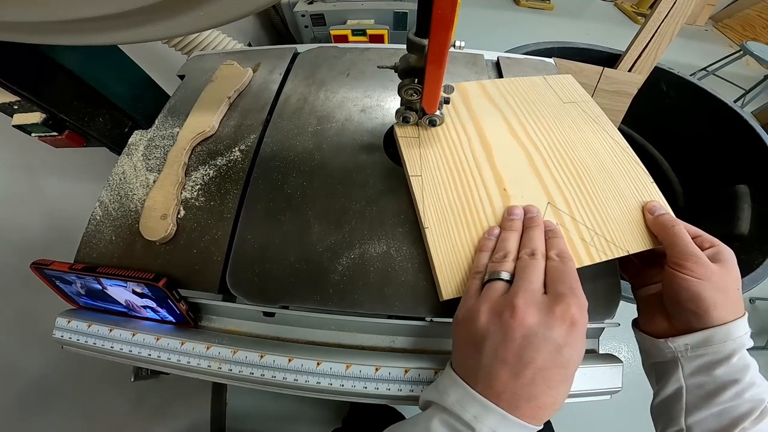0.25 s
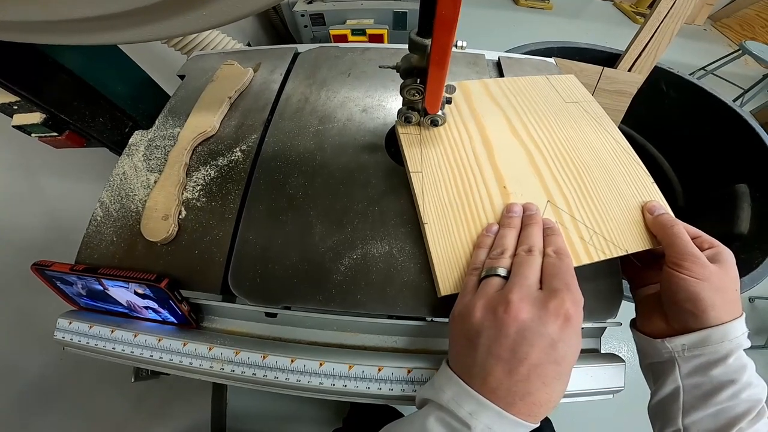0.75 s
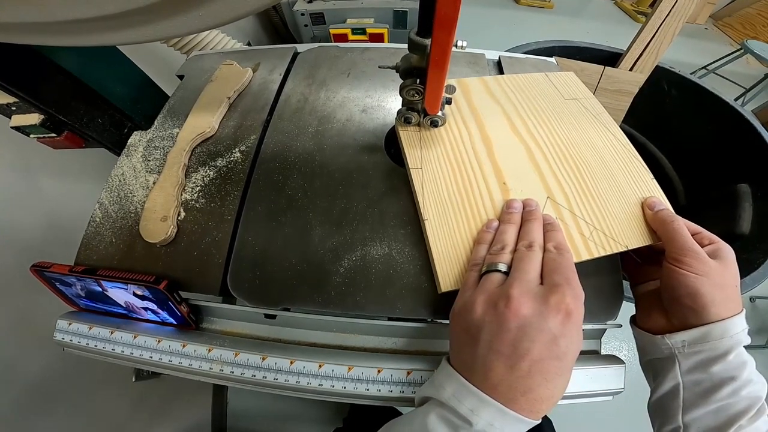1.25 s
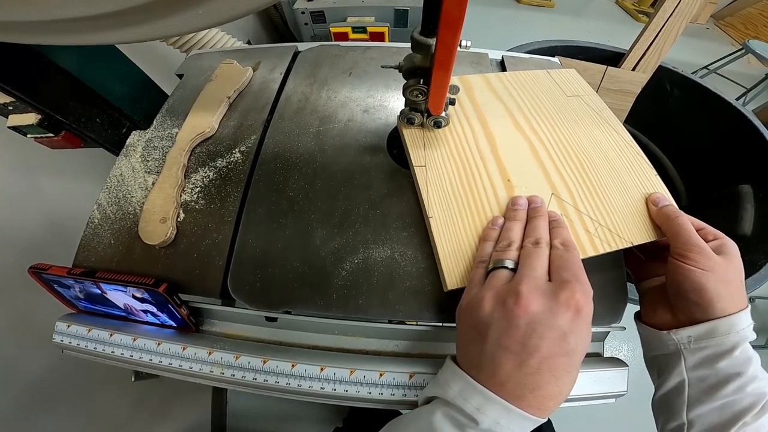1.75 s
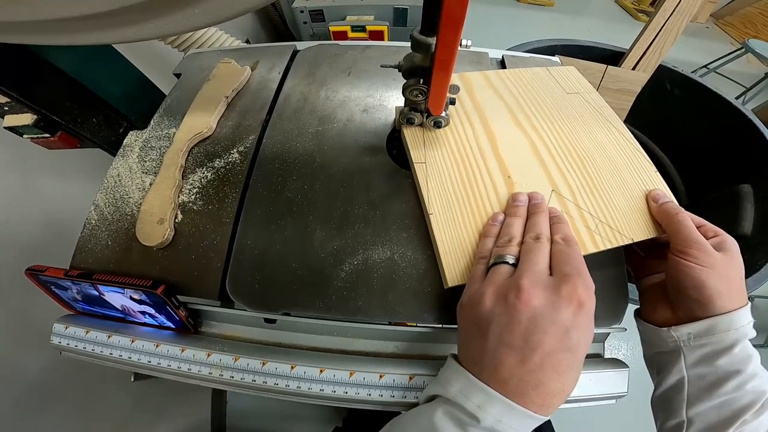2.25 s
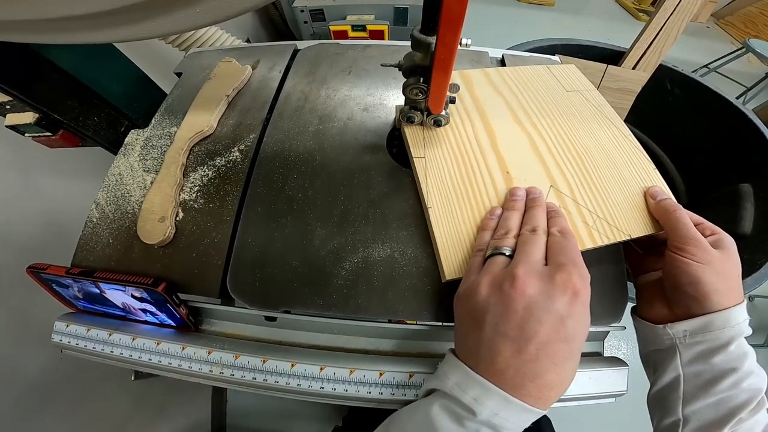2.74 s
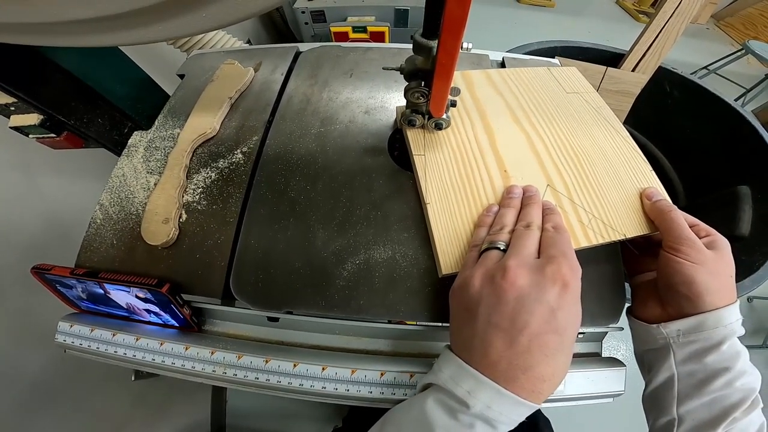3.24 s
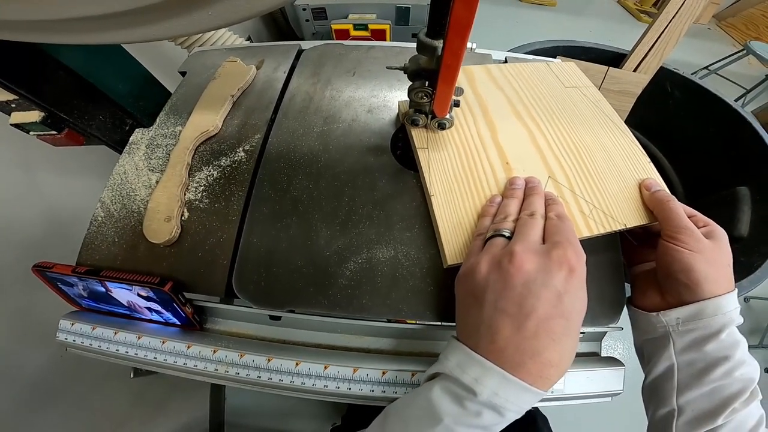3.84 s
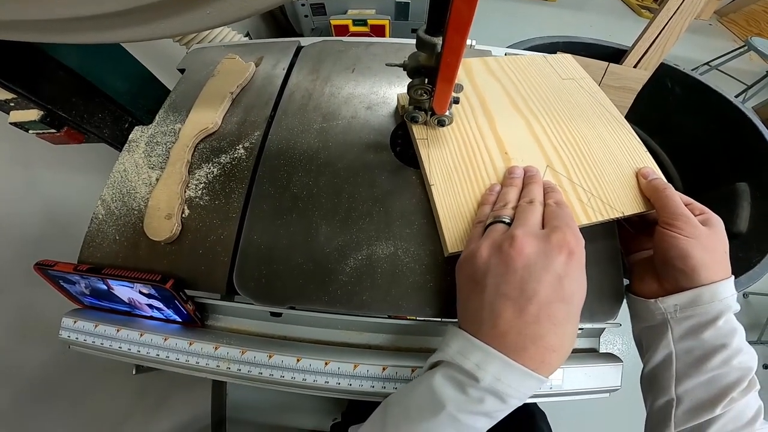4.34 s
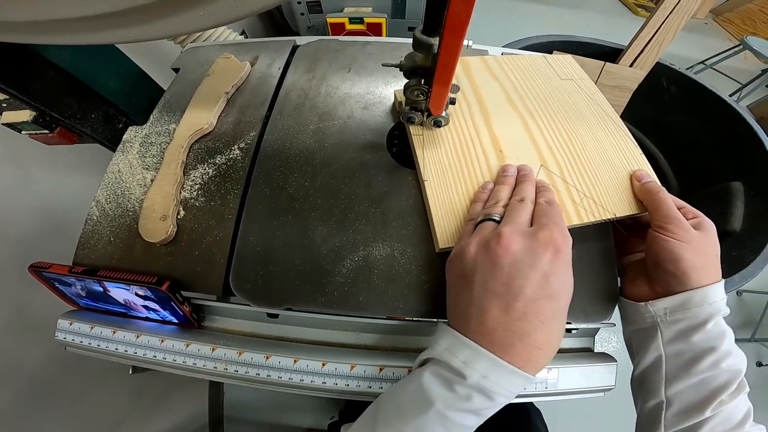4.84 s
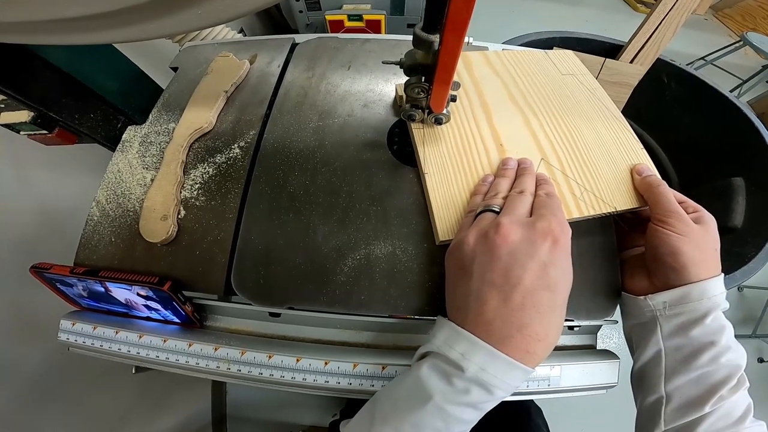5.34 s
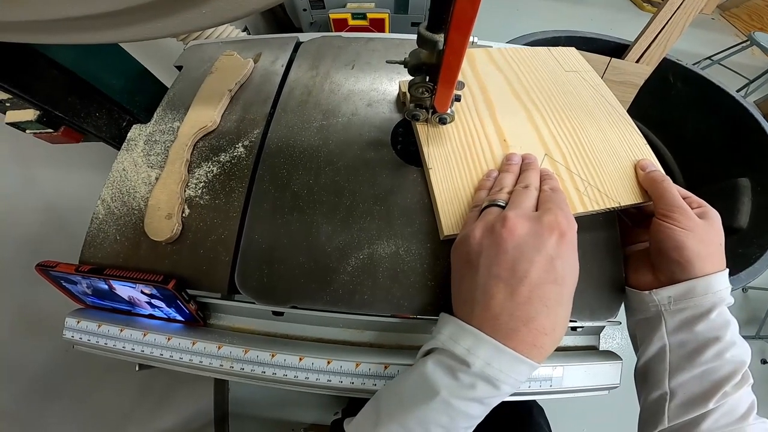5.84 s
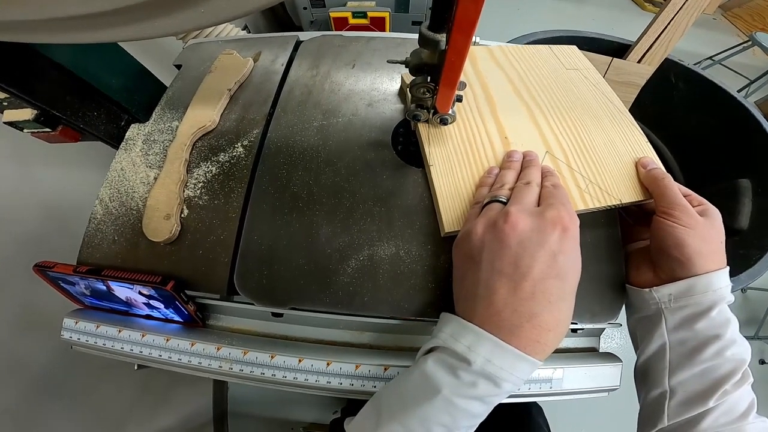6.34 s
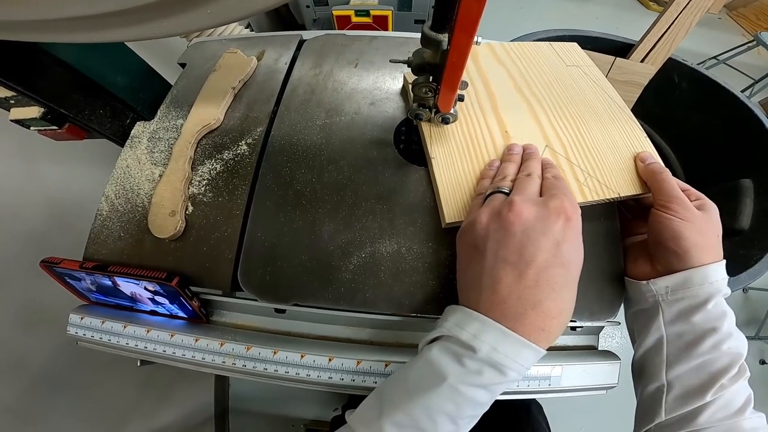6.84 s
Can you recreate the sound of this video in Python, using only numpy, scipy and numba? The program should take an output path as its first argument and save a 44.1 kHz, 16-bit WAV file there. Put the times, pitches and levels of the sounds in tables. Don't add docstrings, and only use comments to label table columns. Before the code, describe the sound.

A band saw is already at full speed and cutting pine from 0 s, heard close above the table in a workshop with short, bright reflections. A steady low hum near 120 Hz and soft frame rumble lie beneath constant raspy fibre hiss and a shrill whine around 3.7 kHz, layered with tooth overtones and throbbing about six times a second. Small high rings flicker during the first second; pressure eases slightly near 1.2 s. At 1.7 s the feed hardens and the blade rings sharply. Around 2.3 s a thin, nearly pure whistle starts and fades by 2.8 s. From 3 to 4.4 s the ringing bends up and down as the blade twists. At 5.2 s table panels give a brief low buzz. From 5.6 to 6.2 s high rings slide downward; then the hiss brightens near 6.7 s, and cutting continues to about 7 s without stopping.

```python
import sys
import numpy as np
from scipy import signal
from scipy.fft import rfft, irfft, next_fast_len
from scipy.io import wavfile
from scipy.ndimage import uniform_filter1d
from numba import njit

SR = 44100
rng = np.random.default_rng(int(sys.argv[2]) if len(sys.argv) > 2 else 0)


def voltage_ratio(decibels):
    exponent = np.asarray(decibels, float) / 20
    return 10 ** exponent


def to_wav(sig):
    pcm = np.clip(np.atleast_2d(sig), -1, 1) * 32767
    pcm = np.round(pcm).astype(np.int16)
    wavfile.write(sys.argv[1], SR, pcm.T)


N = 312333
T = np.arange(N) / SR
SLOW = T[::32]
SIZE = next_fast_len(N + SR)
HZ = np.maximum(np.arange(SIZE // 2 + 1) * SR / SIZE, 1)
WHEEL_HZ = 6.35
STEADY_S = 0.043


def level(x, rms_db):
    return x * voltage_ratio(rms_db) / np.sqrt(np.mean(np.abs(x) ** 2))


def shape(table):
    hz, db = np.transpose(table)
    return voltage_ratio(np.interp(np.log(HZ), np.log(hz), db))


def filtered(x, gain):
    return irfft(rfft(x, SIZE) * gain, SIZE)[..., :N]


def fine(slow, t_s=T):
    return np.interp(t_s, SLOW, slow)


def walk(rate_hz):
    hold = int(SR / 32 / rate_hz)
    steps = np.repeat(rng.standard_normal(len(SLOW) // hold + 1), hold)
    slewed = uniform_filter1d(uniform_filter1d(steps, hold), hold)
    return 1.46 * slewed[:len(SLOW)]


def lasting(start_s, end_s):
    fade_s = 0.035 + 0.06 * (end_s - start_s)
    return np.clip(np.minimum(SLOW - start_s, end_s - SLOW) / fade_s / 2 + 0.5, 0, 1)


def wheel(turn=0.082, quarter=0.12, spokes=0.08):
    angle = 2 * np.pi * WHEEL_HZ * SLOW
    start = rng.uniform(0, 2 * np.pi, 2)
    return 1 + turn * np.cos(angle + start[0]) + quarter * np.cos(4 * angle + start[1]) + spokes * np.cos(16 * angle)


@njit
def ring(x, hz, width_hz):
    y, band, low = np.empty(len(x)), 0., 0.
    for i in range(len(x)):
        g, damping = np.tan(np.pi * hz[i] / SR), width_hz / hz[i]
        v = (band + g * (x[i] - low)) / (1 + g * (g + damping))
        band, low, y[i] = 2 * v - band, low + 2 * g * v, damping * v
    return y


def steadied(rung, floor, exponent):
    return rung / (uniform_filter1d(rung ** 2, int(STEADY_S * SR)) + floor) ** exponent


def port_flutter():
    # hz, level_db_per_hz
    flutter_colour = [(10, -6), (25, -8), (60, -10), (150, -15), (16000, -60)]
    return level(filtered(rng.standard_normal((2, N)), shape(flutter_colour)), -53.5)


def motor():
    # time_s, level_db
    hum_load = [(0, -22.5), (.6, -23.5), (.95, -24.5), (3.5, -25.5), (4.0, -26), (5.4, -22.5), (5.85, -23),
                (6.5, -21), (7.08, -23.5)]
    # hz, under_hum_db, wander_0_to_1
    hum_lines = [(92.5, -20, 0.18), (103, -43, .3), (81.4, -42, .3), (128.5, -41, .3), (175.3, -27, 0.64),
                 (267.7, -28, 0.3), (303, -34, 0.4), (481.6, -25.5, 0), (544.7, -28, 0.12), (600, -56, 0)]
    # hz, width_hz, level_db
    cabinet = [(245.8, 7.9, -43), (339.7, 14, -49.5), (381, 11.3, -45.5), (203, 11, -53)]
    # hz, level_db_per_hz
    rumble_colour = [(12, -50), (22, -13), (64, -1), (110, 7), (150, -8.5), (250, -10.5), (520, -7),
                     (640, -12.5), (900, -18), (1500, -60)]
    hum_hz, rumble_db, rumble_rise_db_per_s = 119.95, -41.5, 0.4
    lines = np.sin(2 * np.pi * hum_hz * T)
    for hz, db, wander in hum_lines:
        size = voltage_ratio(db) * fine(1 + wander * walk(8))
        lines = lines + size * np.cos(2 * np.pi * hz * T + fine(wander * walk(8)))
    hum = np.sqrt(2) * voltage_ratio(np.interp(T, *np.transpose(hum_load))) * lines
    panels = 0
    for hz, width_hz, db in cabinet:
        panels = panels + level(ring(rng.standard_normal(N), np.full(N, 1. * hz), 1. * width_hz), db)
    rumble = level(filtered(rng.standard_normal(N), shape(rumble_colour)), rumble_db)
    return hum + panels + rumble * voltage_ratio(rumble_rise_db_per_s * (T - T.mean()))


def workshop(saw, ports, t60_s=0.26, places=3):
    # hz, echo_re_direct_db
    echo_colour = [(60, -40), (150, -37), (300, -16), (1000, -5), (2500, -9), (4200, -6.5), (6500, -4),
                   (9000, 2.5), (14000, 4)]
    out, spectrum = 0, rfft(saw, SIZE) * shape(echo_colour) * ports
    sway = np.array([walk(1.52) for _ in range(places)])
    for share in sway / np.sqrt(np.sum(sway ** 2, axis=0)):
        tail = rng.standard_normal((2, SR // 2)) * voltage_ratio(-60 * T[:SR // 2] / t60_s)
        tail = tail / np.sqrt(np.sum(tail[0] ** 2))
        out = out + fine(share) * irfft(spectrum * rfft(tail, SIZE), SIZE)[:, :N]
    return out


def whistle():
    # start_s, hz, level_db, fall_db_per_s, end_s
    whistles = [
        (2.27, 2347, -33, 6, 2.78),
        (2.9, 2347, -42, 10, 3.0),
        (2.29, 3227, -33, 12, 2.62),
        (5.235, 390, -37, 20, 5.31),
        (5.325, 387, -30.5, 10, 5.395),
        (5.27, 462, -39, 10, 5.315),
    ]
    out = 0
    for start_s, hz, db, fall_db_per_s, end_s in whistles:
        on = np.clip(np.minimum(SLOW - start_s, end_s - SLOW) / 0.014, 0, 1)
        fading = voltage_ratio(db - fall_db_per_s * (SLOW - start_s) * (on > 0))
        size = on * fading * wheel(0.16, 0.15, 0.05) * (1 + 0.2 * walk(25))
        out = out + np.sqrt(2) * fine(size) * np.cos(2 * np.pi * hz * T + fine(0.4 * walk(25)))
    return out


def fibres(phase, gate=0.49):
    return rng.standard_normal(N) * fine(wheel()) * (1 + gate * np.cos(phase))


def span(phase):
    # time_s, level_db, hz
    span_path = [(0.0, -25, 3784), (0.99, -26.5, 3790), (1.54, -23, 3730), (1.73, -33, 3780),
                 (2.68, -31, 3716), (3.05, -24, 3730), (3.18, -25, 3800), (3.7, -25, 3745),
                 (3.86, -24, 3880), (4.08, -25.5, 3770), (4.24, -32, 3840), (4.28, -26.5, 3700),
                 (4.4, -33, 3820), (4.61, -29, 3820), (5.88, -26.5, 3770), (6.09, -29, 3833),
                 (6.62, -24.5, 3773), (7.08, -25.5, 3740)]
    width_hz = 116
    s, db, hz = np.transpose(span_path)
    hz = fine(np.interp(SLOW, s, hz) + 0.16 * width_hz * walk(18))
    rung = level(ring(ring(fibres(phase), hz, 1.3 * width_hz), hz, 1.3 * width_hz), 0)
    rung = steadied(rung, 0.05, 0.18)
    return level(rung * fine(voltage_ratio(1.3 * np.interp(SLOW, s, db))), -25)


def waking():
    # start_s, end_s, hz, level_db
    board = [(-0.38, 0.98, 1095, -40.5), (0.09, 0.57, 1095, -42.5), (3.4, 4.4, 2700, -42.5),
             (1.33, 1.97, 2750, -46), (0.92, 2.7, 1095, -40), (2, 4.7, 1105, -48), (1.5, 1.98, 1000, -39),
             (2, 2.7, 1300, -43.5), (4.6, 5.7, 1335, -44.5), (0, 2, 1410, -47.5), (2.5, 5, 1425, -39.5),
             (4.5, 5.6, 1610, -38.5), (6.0, 7.3, 1600, -44), (3.6, 4.77, 1890, -38.5),
             (6.5, 7.4, 1880, -37.5), (4.6, 6.0, 2070, -40), (-0.25, 1.84, 2750, -39.5),
             (5, 7.3, 2800, -45)]
    # start_s, end_s, hz, level_db
    kerf = [(-0.5, 1.43, 3450, -34), (1.41, 1.72, 3450, -30), (1.9, 3.2, 3500, -33), (2, 2.88, 3570, -28),
            (4.5, 5.7, 3690, -36), (0.5, 1.8, 6170, -46), (1.9, 2.75, 6650, -39),
                    (4.14, 4.5, 4850, -28.5), (2.75, 3.3, 7530, -40), (3.45, 3.82, 7500, -39),
            (6.5, 7.2, 3500, -36), (6, 6.7, 5250, -33), (2.5, 2.9, 5740, -35), (2, 3.05, 5700, -33),
            (3.85, 5.2, 8675, -39.5), (0.5, 1.9, 8920, -47), (3.8, 4.97, 11820, -49),
            (0.5, 1.85, 12100, -52), (2.5, 3.65, 14800, -60), (.9, 1.95, 14900, -62),
            (-0.9, .15, 14900, -66), (5.8, 7.3, 14850, -64), (2.3, 3.4, 15500, -61), (3.6, 5.2, 10800, -56),
            (1.5, 2.7, 10900, -54), (4, 5.9, 13800, -58)]
    # start_s, end_s, hz, level_db
    blade = [(1.54, 1.68, 2985, -28), (1.72, 1.86, 2990, -31), (1.74, 1.95, 3785, -23.5),
             (2, 2.08, 3850, -25), (6.5, 6.86, 6600, -33), (6.5, 7.1, 5560, -36), (6.55, 6.95, 4300, -34),
             (2, 2.35, 2980, -36), (1.8546, 1.97, 2985, -24.5), (2.5, 3.08, 4325, -34.5),
             (4.6, 5.6, 4315, -31.5), (0.2, 0.58, 5570, -31), (0.61, .63, 5550, -23),
             (0.74, 0.76, 5545, -24), (0.92, 0.95, 5000, -29), (1.02, 1.12, 5530, -27),
             (1.24, 1.46, 5520, -32), (1.05, 1.43, 5440, -31), (1.58, 1.8, 5100, -35),
             (1.67, 1.9, 5380, -32), (2.5, 3.1, 6200, -38), (6, 6.09, 6915, -29), (3.95, 4.8, 11780, -55),
             (5, 5.5, 9700, -46), (0.5, 3.6, 14130, -66), (6.5, 6.6, 5535, -41), (2.75, 3.7, 7540, -44),
             (5.5, 5.6, 7540, -36), (5.72, 5.98, 8890, -37), (5.5, 5.5, 7500, -36), (6.12, 8.2, 9875, -42),
             (6.1, 7.3, 14130, -58)]
    # start_s, end_s, hz, level_db
    squeal = [
        (0.5, 1.5, 6030, -37),
        (3, 3.1, 6030, -40),
        (3, 6.5, 2079, -45.5),
        (-2, 2.7, 3318, -43),
    ]
    # start_s, end_s, hz, level_db
    table_panels = [
        (4.4, 5.1, 250, -44.5),
        (6.0, 6.6, 249, -41.5),
        (0.72, 3.1, 340, -48.5),
        (5.235, 5.4, 400, -38),
        (5.42, 5.5, 370, -38),
        (5.25, 5.33, 450, -41),
    ]
    # start_s, end_s, first_hz, last_hz, level_db
    twists = [(3.917, 3.997, 3670, 3500, -29), (4.25, 4.358, 3790, 3730, -26), (5.6, 5.9, 7500, 6800, -30),
              (5.896, 6.0, 5760, 5230, -25.5), (5.964, 6.058, 4970, 4700, -30),
              (6.043, 6.1, 5550, 5350, -27), (6.1, 6.13, 4980, 4930, -29), (6.15, 6.19, 5350, 5100, -26),
              (3.06, 3.18, 3660, 3830, -30), (3.27, 3.47, 3815, 3750, -28), (3.48, 3.556, 3850, 3680, -26),
              (3.696, 3.837, 3770, 3860, -25), (4.038, 4.14, 3870, 3710, -26),
              (5.93, 6.14, 5700, 4900, -29)]
    blade_width_hz, twist_blur = 68, 0.81
    rows = []
    for spells, q in [(board, 25.7), (kerf, 26.5), (squeal, 260), (table_panels, 19.5)]:
        rows += [(t0, t1, hz, hz, hz / q, db) for t0, t1, hz, db in spells]
    rows += [(t0, t1, hz, hz, blade_width_hz, db) for t0, t1, hz, db in blade]
    return rows + [(t0, t1, hz0, hz1, twist_blur * abs(hz0 - hz1), db) for t0, t1, hz0, hz1, db in twists]


def resonances(phase, teeth):
    drive, out = fibres(phase) + voltage_ratio(-40) * teeth, np.zeros(N)
    for start_s, end_s, first_hz, last_hz, width_hz, db in waking():
        fade = lasting(start_s, end_s)
        awake_s = SLOW[fade > 0]
        on = slice(int(awake_s[0] * SR), int(awake_s[-1] * SR))
        glide_hz = np.interp(SLOW, [start_s, end_s], [first_hz, last_hz])
        hz = fine(glide_hz + 0.13 * width_hz * walk(9), T[on])
        rung = level(ring(ring(drive[on], hz, 1.36 * width_hz), hz, 1.36 * width_hz), 0)
        rung = steadied(rung, 0.06, 0.125)
        out[on] += level(rung, db) * fine(fade, T[on])
    return out


def hollows():
    # hz, width_hz, gain_db
    dips = [(673, 140, -4.5), (1650, 150, -2.5), (2235, 80, -6.5), (2475, 73, -5.5), (3310, 170, -2.5),
            (4740, 170, -4), (6330, 220, -6), (8230, 160, -9), (10800, 560, -6.5), (3160, 70, -2.5),
            (7130, 80, -2.5), (9100, 130, -5.5), (3610, 50, -2.5), (13350, 250, -3), (2600, 62, -2)]
    return voltage_ratio(sum(db * np.exp(-((HZ - hz) / width_hz) ** 2) for hz, width_hz, db in dips))


def tearing(phase):
    # hz, level_db_per_hz
    tear_colour = [(400, -40), (750, -24.5), (1100, -21), (2000, -16.5), (2350, -17), (3200, -15),
                   (3750, -4), (4200, -10), (5800, -10.5), (6400, -15.5), (8000, -18), (11000, -32.5),
                   (12200, -33.5), (14200, -45.5), (15800, -53)]
    # time_s, pressure_db, grain_dryness_db
    feed_path = [(0, 0.5, 1), (.6, -1.5, 1.5), (1.2, -3, -0.5), (1.7, 1.5, 0), (2.0, -1.5, -2.5),
                 (2.3, 3.5, -4), (2.8, 1, -3.5), (3.2, -1, -4.5), (4.0, -0.5, -2), (4.3, 0, 2),
                 (4.9, 1, 2.5), (5.6, 0.5, 3.5), (5.9, -2, -1), (6.198, 0, 0), (6.45, -1, 1),
                 (6.7, -1.5, 5), (7.08, 0, 0.5)]
    # hz, db_per_db_of_dryness
    dry_share = [(900, 0), (1400, -0.05), (3600, -0.07), (5000, 0.16), (8000, 1.24), (13000, 0.2)]
    s, feed, dryness = np.transpose(feed_path)
    feed_db, dry_db = np.interp(SLOW, s, feed), np.interp(SLOW, s, dryness)
    hz, share = np.transpose(dry_share)
    source = rfft(fibres(phase), SIZE) * shape(tear_colour) * hollows() * (HZ > 500)
    out = 0
    for octave in np.arange(9, 14.1, 0.25):
        slice_gain = np.clip(1 - 4 * np.abs(np.log2(HZ) - octave), 0, 1)
        flicker_db = 0.82 * walk(2.59) + 1.23 * walk(14)
        db = feed_db + np.interp(octave, np.log2(hz), share) * dry_db + flicker_db
        out = out + fine(voltage_ratio(db)) * irfft(source * slice_gain, SIZE)[:N]
    return level(out, -24)


def overtone(phase, order, loops=0):
    loop_hz = 2.7
    shake = 1 + (0.24 + 0.017 * order) * (walk(40) + 1j * walk(40))
    wobble = order * 0.08 * np.sin(2 * np.pi * WHEEL_HZ * SLOW) + 2 * np.pi * loops * loop_hz * SLOW
    throb = wheel(0.11, 0.26 + 0.091 * (order == 2), 0.18)
    swing = shake * throb * np.exp(1j * (wobble + rng.uniform(0, 2 * np.pi)))
    return level(fine(swing.real) * np.cos(order * phase) - fine(swing.imag) * np.sin(order * phase), 0)


def swell(spells, order):
    gains = [db * lasting(t0, t1) for t0, t1, at, db in spells if round(at) == round(order)]
    return sum(gains, np.zeros(len(SLOW)))


def song(phase):
    # multiple, level_db
    strong_orders = [(2, -41.5), (3, -51), (4, -30), (6, -29.5)]
    # start_s, end_s, multiple, gain_db
    strong_swells = [(1.39, 2.31, 2, 9), (1.77, 1.9, 2, 3), (2.5, 2.8, 2, 3), (2.5, 4.8, 2, 4.5),
                     (3.5, 4.18, 2, 4.5), (6.14, 6.44, 2, 6), (6.16, 6.3, 2, 3), (6.08, 8.6, 2, 1.5),
                     (6.56, 7.3, 2, 5), (5.75, 6.05, 2, -4), (0, 2.1, 3, 13.5), (2.5, 3.73, 3, 12.5),
                     (2, 2.6, 3, 1), (-0.26, 0.5, 3, 6), (1.5, 1.96, 3, 8), (4, 4.22, 3, 15),
                     (4, 5.2, 3, -6), (5.5, 5.66, 3, 5), (-0.4, 0.51, 4, 1), (3, 4, 4, 8), (3.5, 3.6, 4, 2),
                     (2.5, 2.8, 4, -2.5), (4, 4.3, 4, 2), (4.5, 5.07, 4, 6.5), (4.5, 4.52, 4, 3),
                     (5, 7.2, 4, 1.5), (5.0, 12, 4, 2.5), (5.5, 5.8, 4, 2.5), (6.5, 7.3, 4, 5.5),
                     (.12, 1.46, 6, 7), (0.75, 1.24, 6, 2.5), (1.35, 1.46, 6, 3), (1.5, 1.87, 6, -4.5),
                     (6, 6.53, 6, 2.5), (3.05, 3.16, 6, 5.5), (3.25, 3.33, 6, 6), (5.5, 5.76, 6, 3),
                     (6, 5.92, 6, 5), (5.98, 6.09, 6, 3), (2.5, 2.87, 6, 5), (3.5, 3.6, 6, 3.5),
                     (.37, .44, 6, -10), (1.93, 2.32, 6, 6), (3.5, 4.87, 6, -4.5), (5.5, 7.3, 6, 2),
                     (6.7, 7.3, 6, 3)]
    # multiple, level_db
    weak_orders = [(1, -56.5), (5, -41), (7, -45), (8, -34.5), (9, -52), (10, -52.5), (11, -55),
                   (12, -52.5), (13, -68), (14, -63), (15, -67)]
    # start_s, end_s, multiple, gain_db
    weak_swells = [(-0.5, 5.2, 1, 4), (-1, 3.2, 1, 3), (.15, 0.63, 1, 5.5), (0.4, 1.5, 1, 3.5),
                   (1.7, 1.96, 1, 3), (5, 8, 1, -5.5), (3.72, 4.65, 5, 8.5), (4.14, 4.5, 5, 3.5),
                   (2.5, 3.68, 5, -3), (6.0, 7.3, 7, 4), (4.4, 5.9, 10, 4), (4.2, 5.2, 9, -1),
                   (-.2, 1.9, 9, 4), (-0.34, 0.37, 5, 6), (4.5, 4.68, 5, 4), (4.6, 5.8, 5, 5),
                   (6, 6.15, 5, 1), (5.5, 6, 7, 7), (4, 6.6, 7, 2.5), (1, 1, 8, 4), (1.23, 1.53, 8, 5.5),
                   (1.7, 2.75, 8, -6), (3, 3.55, 8, -6), (3.6, 6.2, 8, 3), (6.5, 7.7, 8, 6),
                   (3.5, 8.8, 9, 6.5), (4, 4.7, 9, 8.5), (5.71, 5.98, 9, 10), (5.0, 5.62, 9, -3),
                   (5.5, 7.3, 9, 4), (3.5, 5.8, 10, 3.5), (6.15, 7.3, 10, 9.5), (6.5, 6.9, 10, 10.5),
                   (4, 4.8, 10, 4), (4, 4.35, 8, 2.5), (6.5, 5.5, 8, -1), (-2, 2.4, 10, 4),
                   (-0.6, 1.8, 12, 5.5), (1.5, 3.8, 12, 5), (4, 4.3, 12, 4), (1.4, 2, 14, 11),
                   (5, 5.85, 14, 8), (5, 5.85, 14, 3)]
    out, even = 0, 0
    for (order, db), loops in zip(strong_orders, [1, 1, -1, -1]):
        out = out + fine(voltage_ratio(db + swell(strong_swells, order))) * overtone(phase, round(order), loops)
    for order, db in weak_orders:
        tone = overtone(phase, round(order))
        out = out + fine(voltage_ratio(db + swell(weak_swells, order) + walk(3.19))) * tone
        even = even + tone
    return out, even


def scene():
    # time_s, teeth_per_s
    tooth_rate = [(0, 989), (.5, 988.7), (.9, 987.6), (1.4, 987.5), (2.0, 989.6), (2.5, 989.5),
                  (3.0, 988.0), (4.0, 987.4), (4.5, 987.5), (5.0, 988.5), (6.0, 988.7), (6.5, 989.2)]
    # hz, left_minus_right_db
    ear_db = [(60, 0.5), (110, 1.0), (200, 0), (380, -0.5), (700, 0), (1290, 0.5), (2380, -1), (4400, 0),
              (7800, -1), (8700, -6.5), (9500, -2.5), (12000, -8), (15000, -7)]
    # hz, left_lead_rad
    ear_phase = [(20, -0.5), (120, 0.11), (500, 0.23), (2150, -0.82), (5170, -1.25), (6120, -2),
                 (7750, -2.4), (8800, -1.7), (10300, -2.4), (11800, -3.2), (14000, -2)]
    # time_s, left_minus_right_db
    pan_path = [
        (0, -1),
        (1.75, -1.5),
        (2.5, -0.7),
        (4.5, 0),
        (4.9, 0.5),
        (6.4, 1),
        (7.08, -0.7),
    ]
    phase = 2 * np.pi * np.cumsum(np.interp(T, *np.transpose(tooth_rate))) / SR
    tones, teeth = song(phase)
    cut = tearing(phase) + resonances(phase, teeth)
    tones = tones + span(phase) + whistle()
    cut = cut + tones
    hum = motor()
    hz, lead_rad = np.transpose(ear_phase)
    tilt = np.sqrt(shape(ear_db))
    direct = np.array([tilt * np.exp(1j * np.interp(HZ, hz, lead_rad)), 1 / tilt])
    pan_db = np.interp(T, *np.transpose(pan_path))
    turn = voltage_ratio(np.outer([0.5, -0.5], pan_db - np.mean(pan_db)))
    beam = 0.82
    echo = workshop(cut - beam * tones + hum, np.abs(direct))
    return turn * filtered(cut, direct) + filtered(hum, direct) + echo + port_flutter()


def roll_off(x):
    return signal.sosfilt(signal.butter(12, 15610, fs=SR, output="sos"), x)


def record(dry):
    ceiling = 0.75
    mix = ceiling * np.tanh(dry / ceiling)
    return roll_off(mix)


dry = scene()
out = record(dry)
to_wav(out)
```